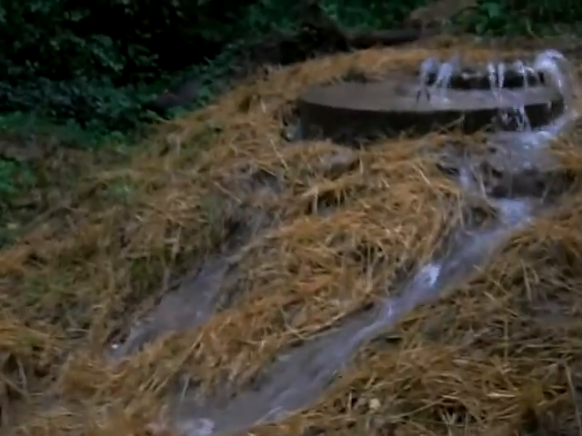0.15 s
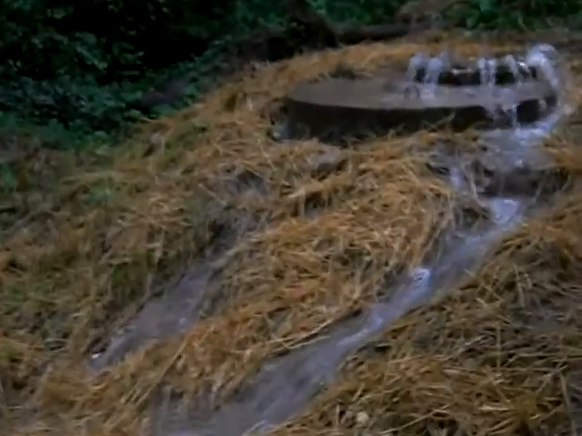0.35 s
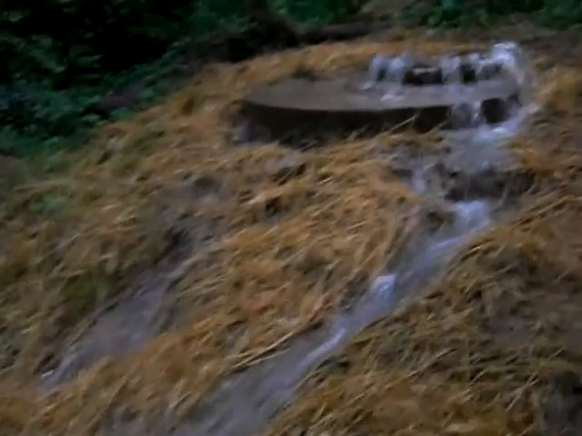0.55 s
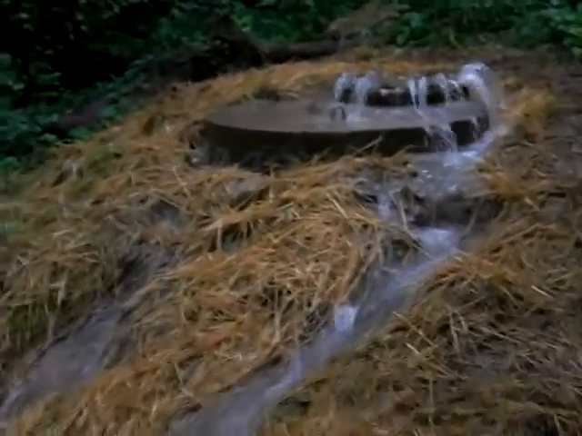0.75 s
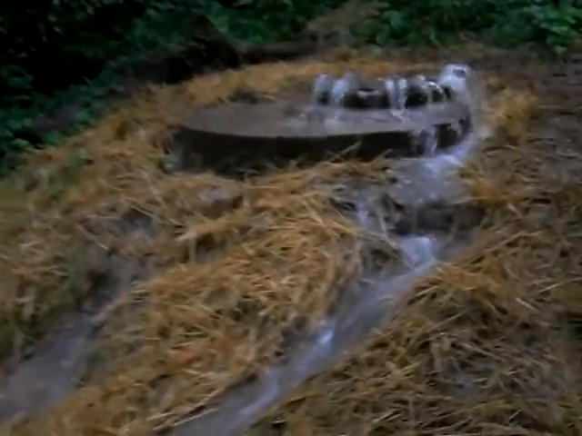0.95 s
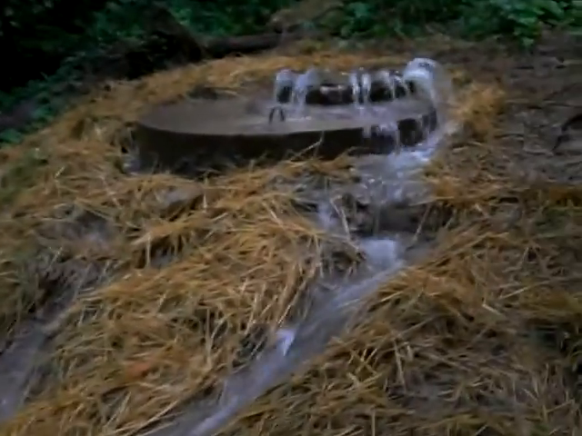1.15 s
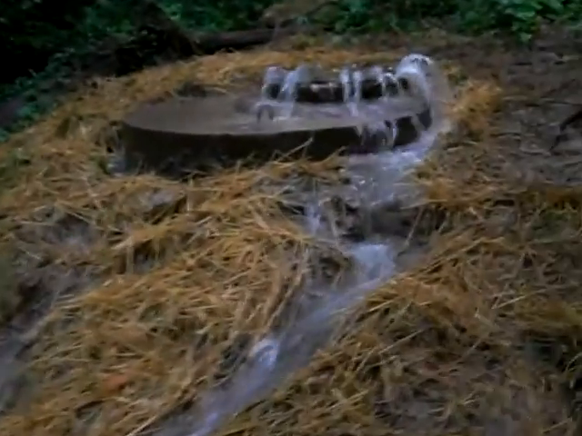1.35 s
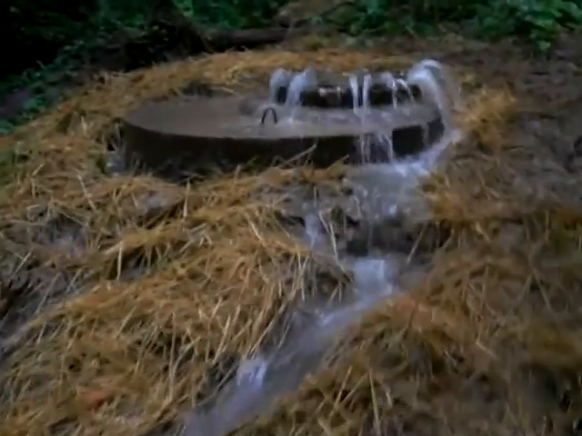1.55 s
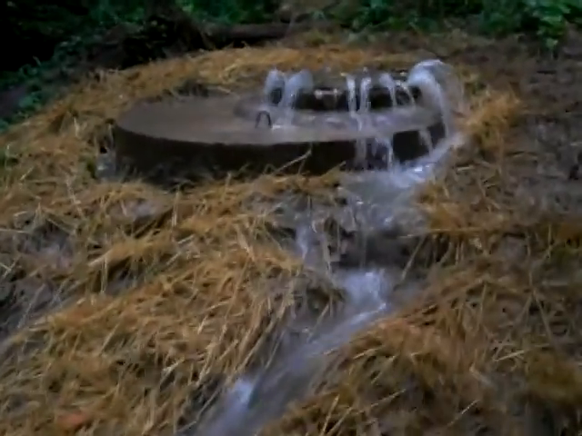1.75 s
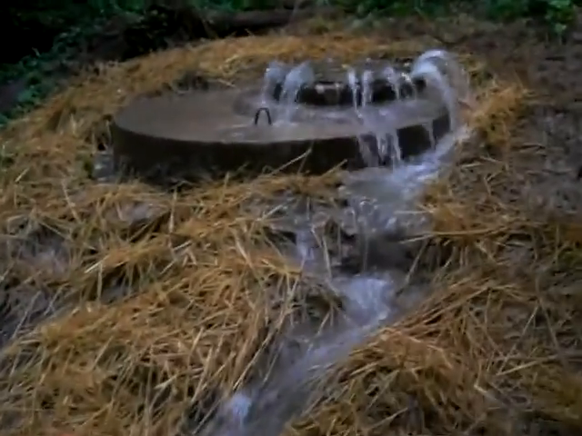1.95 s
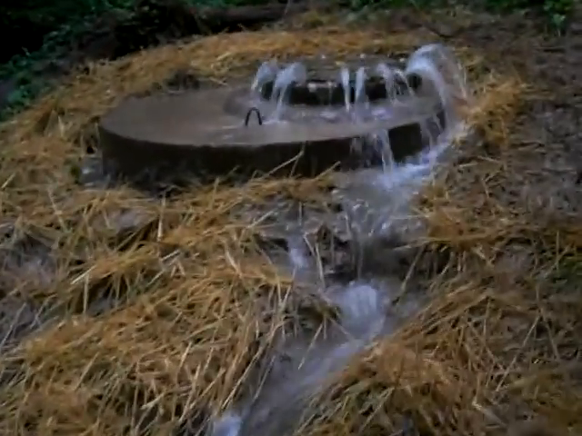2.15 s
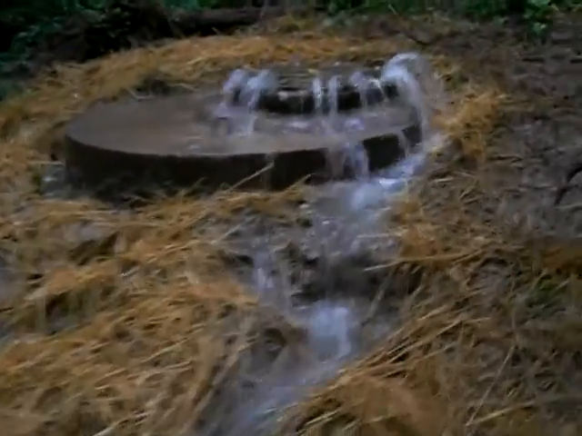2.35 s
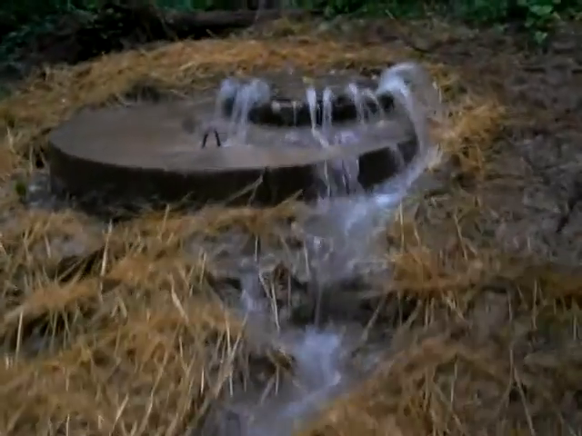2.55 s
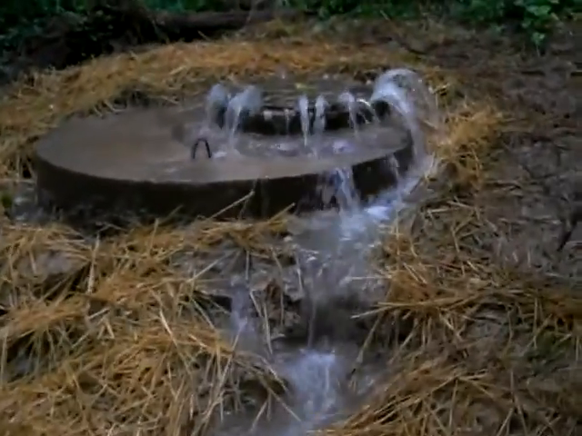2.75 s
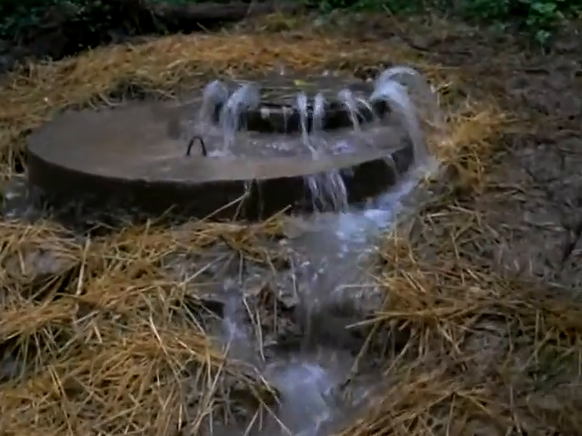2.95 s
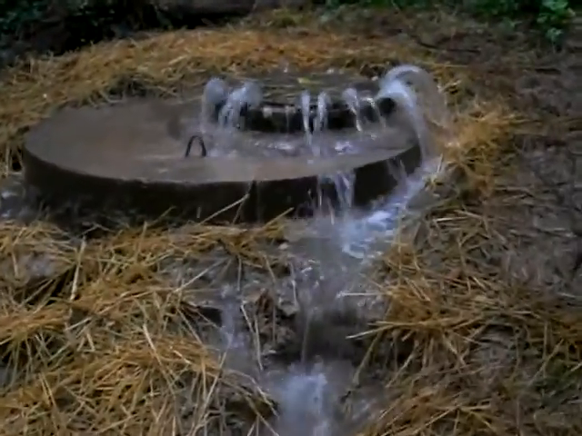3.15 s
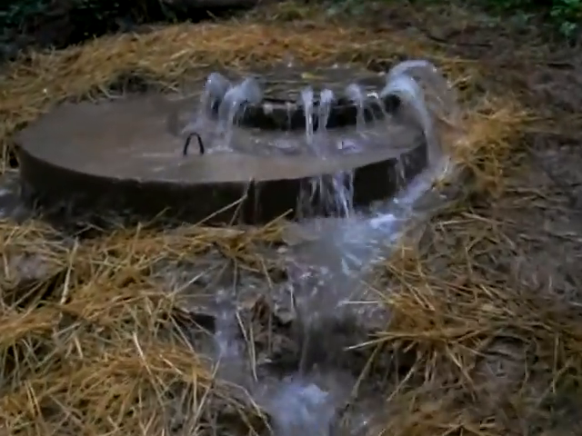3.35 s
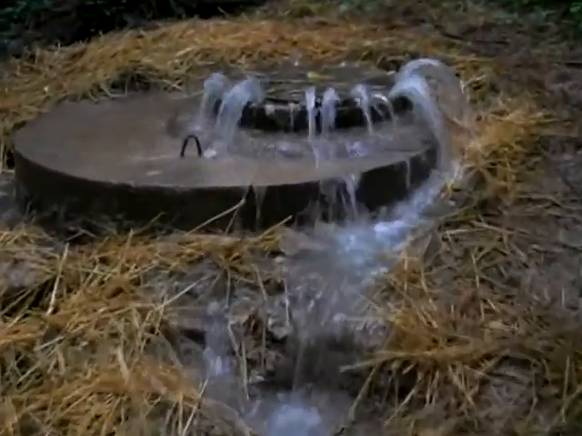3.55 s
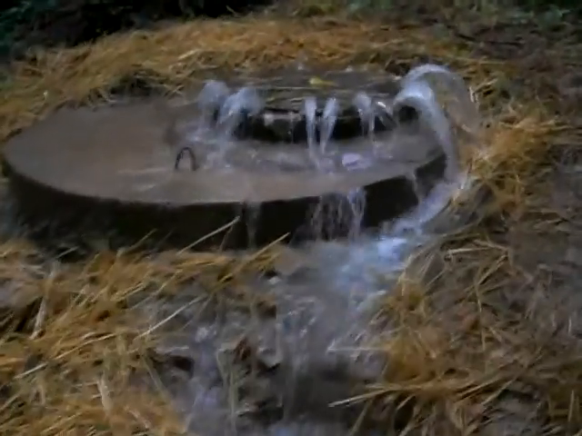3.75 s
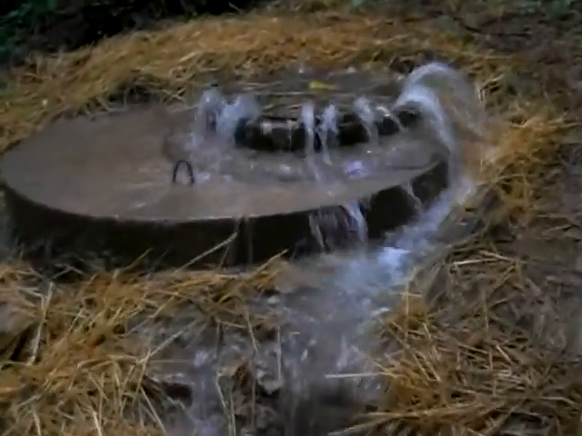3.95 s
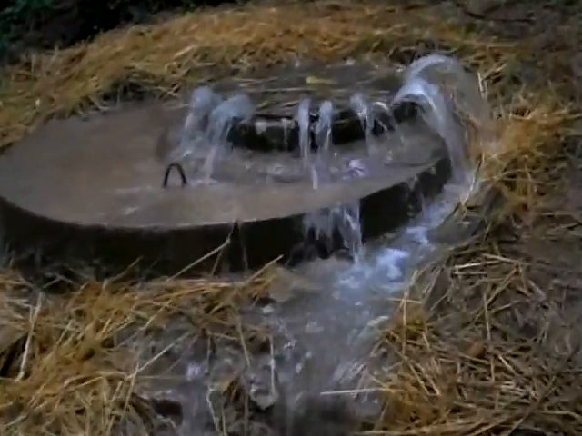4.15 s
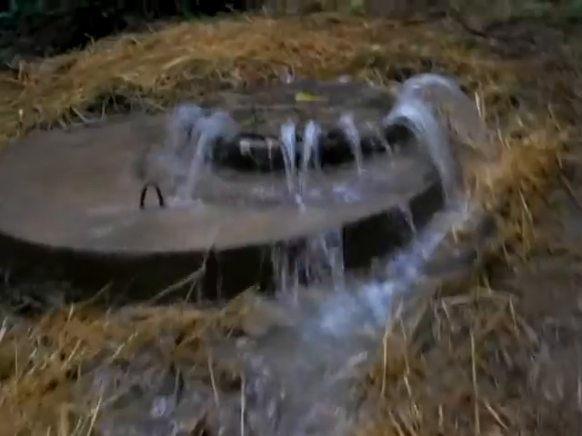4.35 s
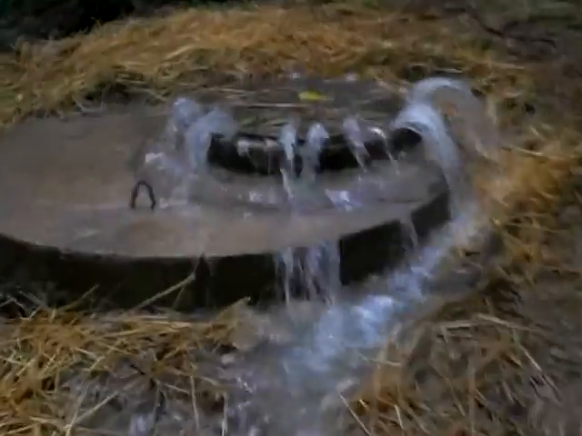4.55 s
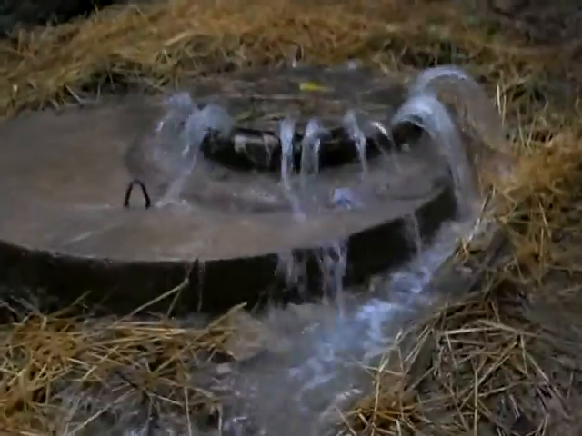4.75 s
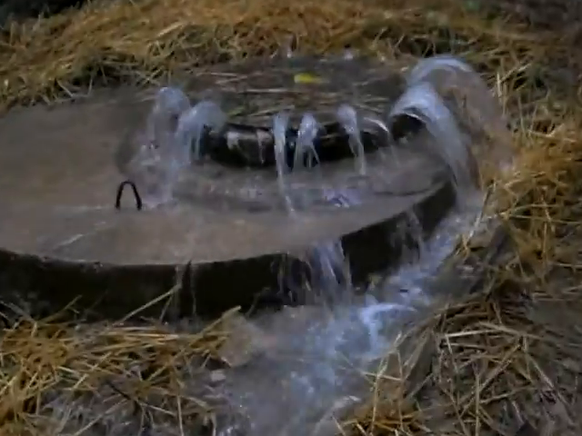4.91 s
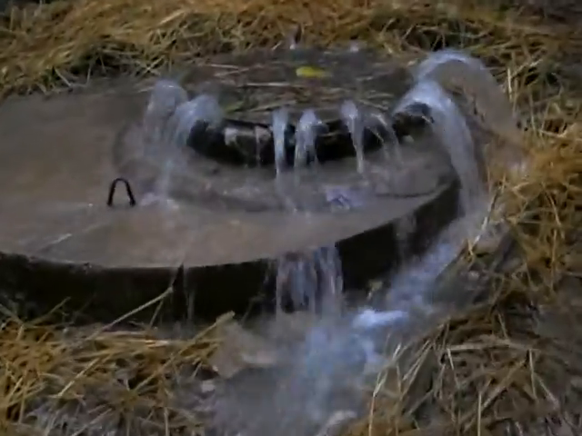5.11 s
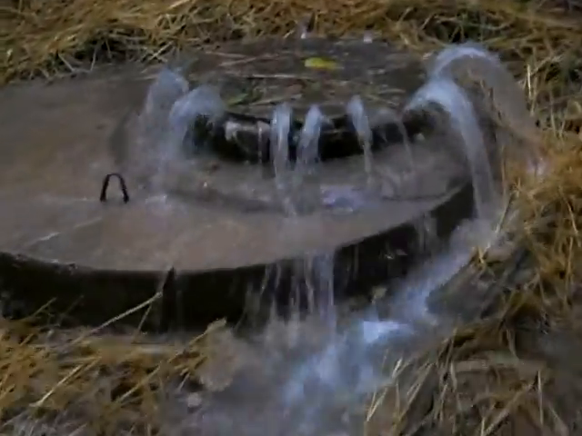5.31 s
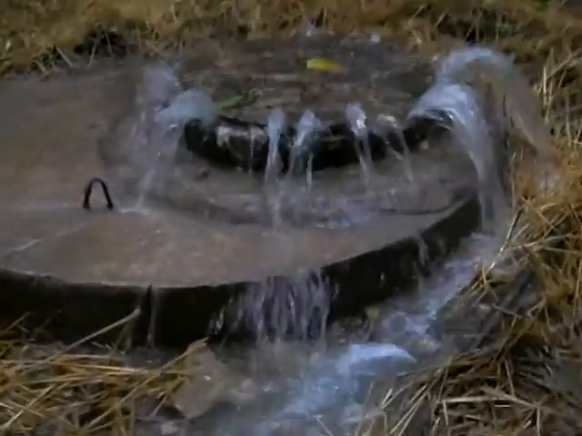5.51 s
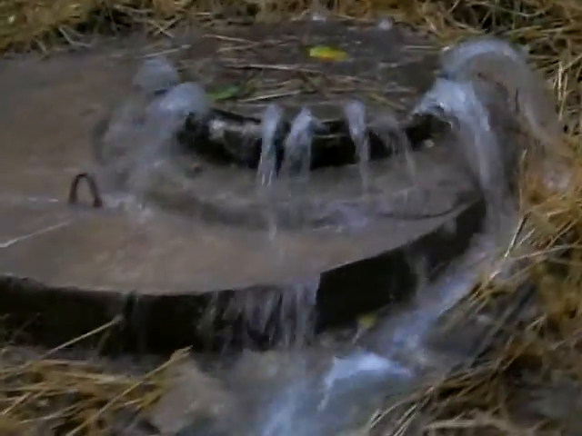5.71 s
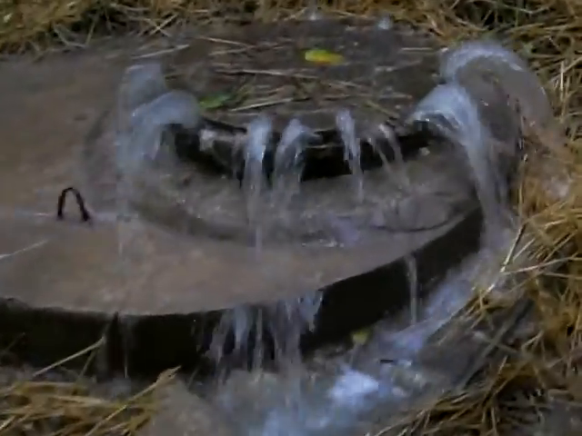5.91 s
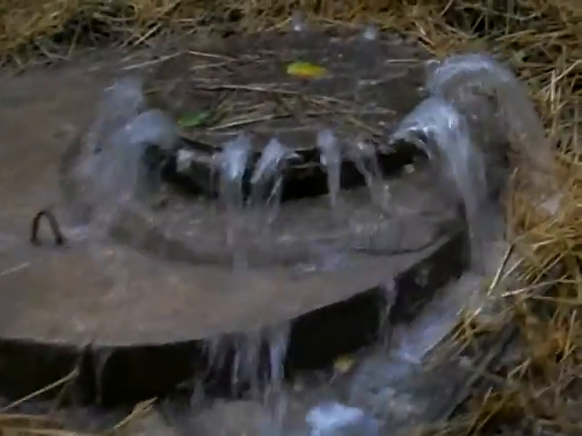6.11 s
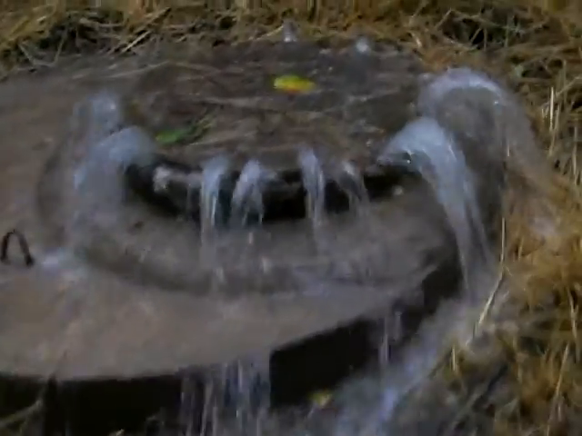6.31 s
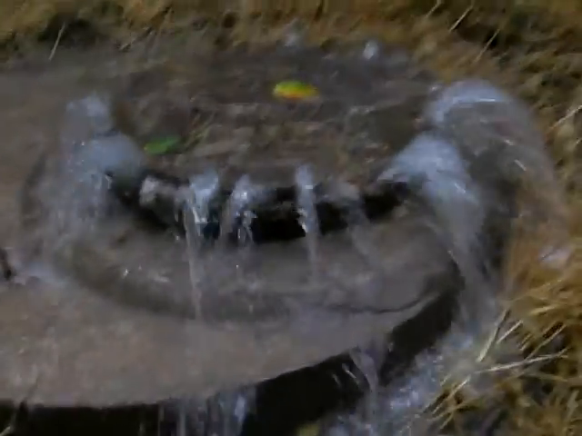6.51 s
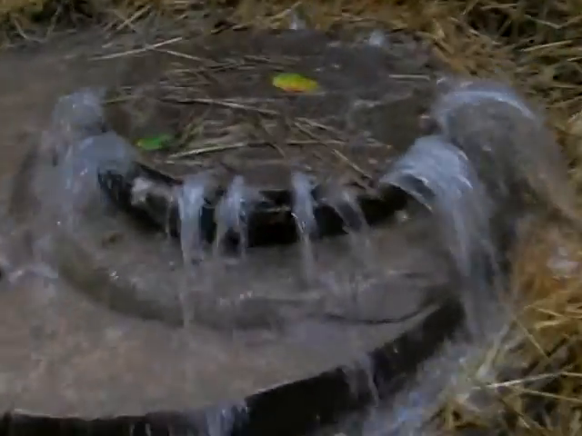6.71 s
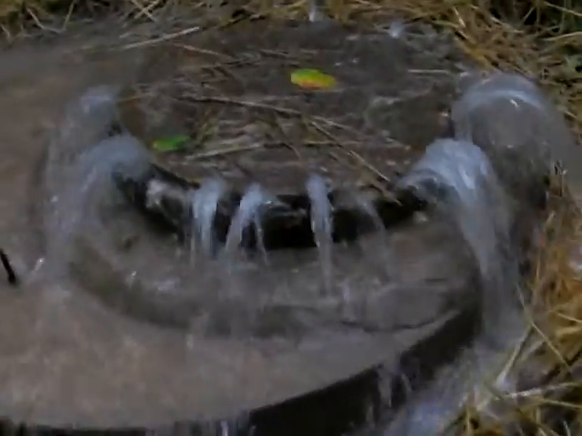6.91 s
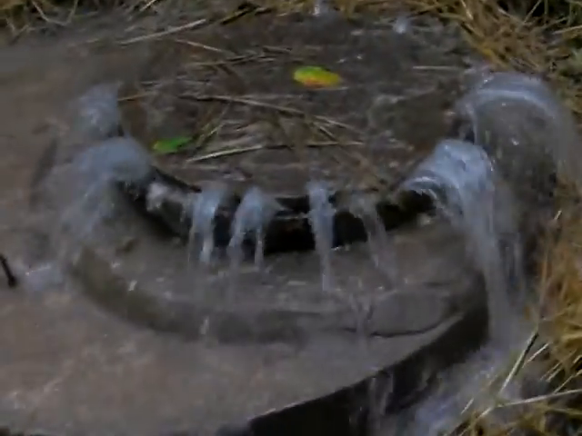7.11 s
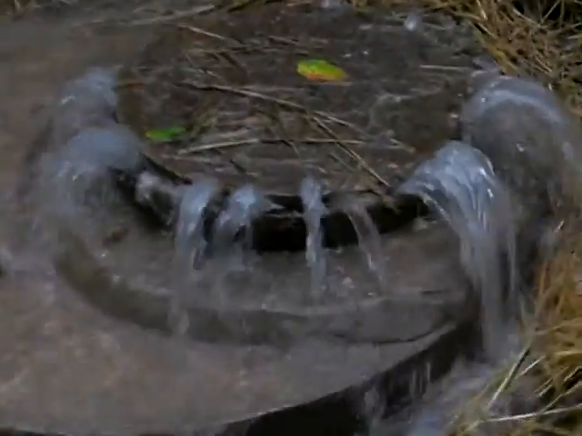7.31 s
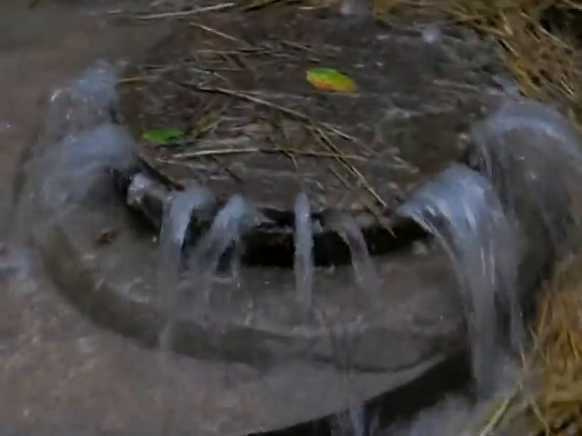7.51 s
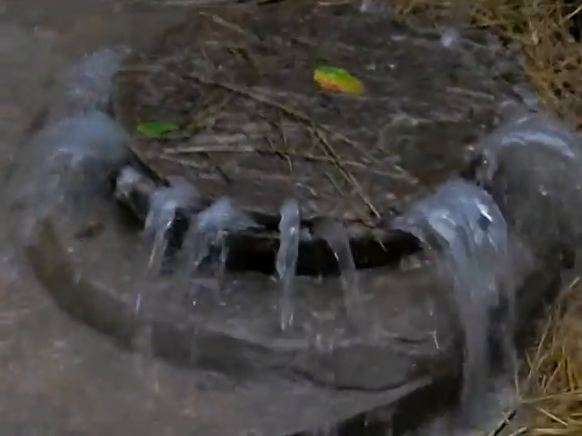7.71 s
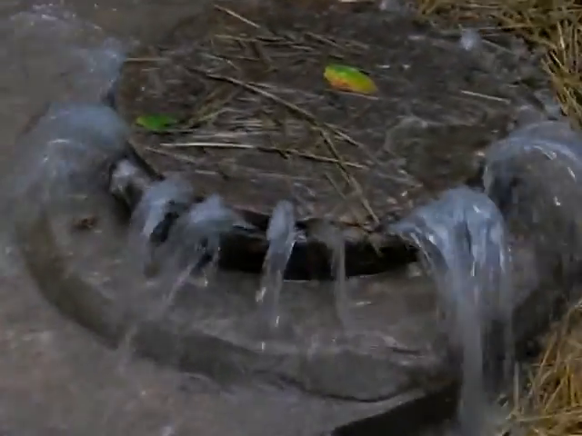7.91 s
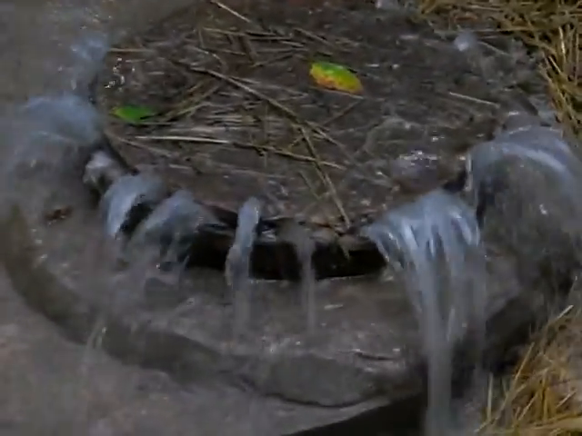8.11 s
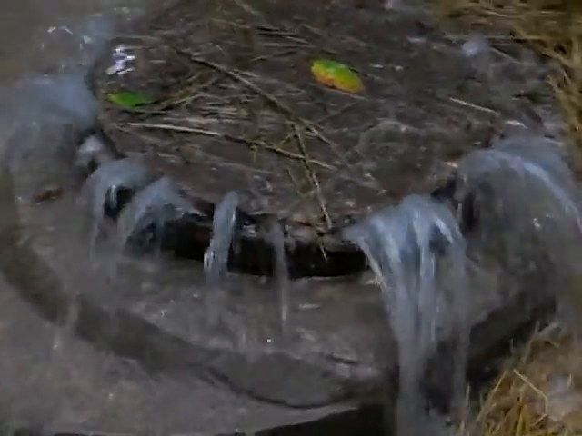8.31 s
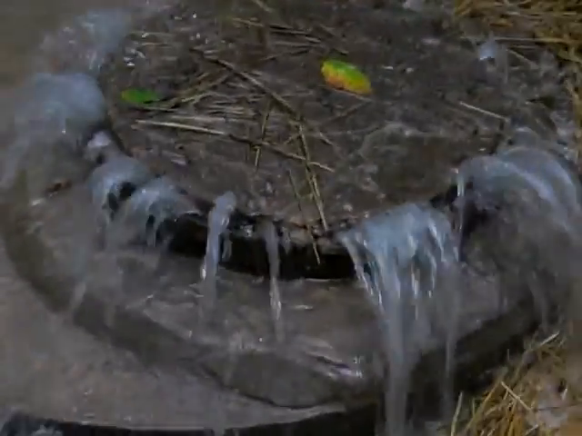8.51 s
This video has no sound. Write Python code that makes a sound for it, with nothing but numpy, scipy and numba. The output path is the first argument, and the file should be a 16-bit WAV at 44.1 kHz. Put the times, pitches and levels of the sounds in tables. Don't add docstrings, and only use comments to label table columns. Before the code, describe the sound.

A continuous outdoor spill of water, heard in mono by a microphone walking toward it. At 0 seconds it is moderately distant: a soft, bubbly babble with light spray hiss and drops pattering on concrete, while a faint low engine drone swells and fades over steady distant traffic rumble. Scattered hollow plops and small sharp ticks stand out from the start. From about 2 to 4 seconds the wash gradually thickens and brightens, with more drips and crisp splats. Around 5.5 to 6.5 seconds strong bright, watery pops jump forward, and the spray becomes close and busy. From 7 to 8.6 seconds it is loudest, with dense fizzing froth, hard splatter, rounded plops, short low gulps and bright near splats, peaking around 8.1 seconds and easing very slightly. The water never stops.

```python
import sys
import numpy as np
from scipy import signal
from scipy.fft import rfft, irfft, next_fast_len
from scipy.io import wavfile
from scipy.ndimage import uniform_filter1d
from numba import njit

SR = 44100
rng = np.random.default_rng(int(sys.argv[2]) if len(sys.argv) > 2 else 0)


def file_out(sig):
    cols = np.atleast_2d(sig).T
    lim = np.clip(cols, -1, 1)
    pcm = np.round(lim * 32767).astype(np.int16)
    wavfile.write(sys.argv[1], SR, pcm)


def ratio(d):
    e = np.asarray(d, float) / 20
    return 10 ** e


N = 382347
CLIMB = 0.015


def rms_one(x):
    return x / np.sqrt(np.mean(x ** 2) + 1e-20)


def in_time(rows):
    s, *columns = np.transpose(rows)
    return [np.interp(np.arange(N) / SR, s, column) for column in columns]


def at_hz(points, hz):
    point_hz, point_db = np.transpose(points)
    return np.interp(np.log(hz), np.log(point_hz), point_db)


def colour(x, spectrum):
    size = next_fast_len(N)
    hz = np.arange(size // 2 + 1) * SR / size + 1
    shaped = rfft(x, size) * ratio(at_hz(spectrum, hz))
    return rms_one(irfft(shaped, size)[:N])


def drift(rate):
    r = np.exp(-16 * np.pi * rate / SR)
    noise = rng.standard_normal(N // 8 + 4002)
    slow = signal.lfilter([1], [1, -2 * r, r * r], noise)[4000:]
    return np.interp(np.arange(N) / 8, np.arange(len(slow)), rms_one(slow))


def flutter(rate):
    quick = drift(rate)
    return rms_one(quick - uniform_filter1d(quick, size=SR // 11))


@njit
def add(out, peak_s, height, hz, cycles, phase, climb, rate):
    for i in range(len(hz)):
        rise = cycles[i] / 2.45 / hz[i] * rate
        start = int(peak_s[i] * rate - rise)
        for n in range(max(0, -start), min(int(8 * rise), len(out) - start)):
            u = n / rise
            turn = 2 * np.pi * hz[i] * (n - rise) / rate * (1 + climb * (u - 1) / 2)
            out[start + n] += height[i] * u * np.exp(1 - u) * np.sin(turn + phase[i])


# time in seconds, splash level in dB.
APPROACH = [
    (0.0, -37.5),
    (0.8, -36),
    (2.4, -33.5),
    (4.4, -30),
    (5.9, -28),
    (8.1, -25.5),
    (8.67, -26),
]


def approach():
    splash_db, = in_time(APPROACH)
    past_midway_db = splash_db + 30
    gurgle_db = -42 + 0.61 * past_midway_db
    babble_db = -34.5 + 0.73 * past_midway_db
    return splash_db, gurgle_db, babble_db


def nearness_db(hz, splash_db, gurgle_db, babble_db):
    low = np.clip(np.log(1400 / hz) / np.log(1400 / 800), 0, 1)
    high = np.clip(np.log(hz / 2300) / np.log(3600 / 2300), 0, 1)
    middle = 1 - low - high
    return low * (gurgle_db + 14) + high * (splash_db + 2) + middle * (babble_db + 6.5)


# frequency in Hz, level in dB per Hz.
FROTH = [(120, -44), (200, -12.5), (231, -8.5), (344, -13), (405, -6), (570, 0.5), (775, -2.5), (2290, 2.5),
         (3120, -2.5), (3800, -0.5), (10500, -5.5), (11900, -11.5), (15000, -15)]


def froth(splash_db, gurgle_db, babble_db, per_s, spread_db, clump_db, cycles, climb):
    place, pitch, size, length, phase = rng.random((5, int(per_s * N / SR)))
    at = (place * (N - 1)).astype(int)
    hz = (200 ** 0.5 + pitch * (15500 ** 0.5 - 200 ** 0.5)) ** 2
    size_db = spread_db * np.minimum(-np.log(size + 1e-9), 4)
    lows, highs = flutter(21), flutter(51)
    clumps = np.where(hz < 1500, lows[at], 0.52 * lows[at] + highs[at])
    turns = cycles * (0.6 + 0.8 * length)
    height = ratio(size_db + clump_db * clumps + at_hz(FROTH, hz)) * hz ** 0.75
    power = np.sum(height ** 2 * turns / hz) * 0.377 * SR / N
    height = height * ratio(nearness_db(hz, splash_db[at], gurgle_db[at], babble_db[at]))
    near = np.zeros(N)
    add(near, at / SR, height, hz, turns, 2 * np.pi * phase, climb, SR)
    return near / np.sqrt(power)


# frequency in Hz, level in dB per Hz.
SPATTER = [(500, -25), (1500, -2), (4000, 2.5), (9000, -4.5), (12000, -4.5), (16000, -30)]


def spatter(per_s, spread_db, clump_db, burst_s):
    sizes = ratio(spread_db * np.minimum(rng.exponential(1, N), 3.5))
    flurries_db = clump_db * (flutter(22) + 0.7 * flutter(45))
    struck = rng.random(N) < per_s * ratio(flurries_db) / SR
    fade = signal.lfilter([1], [1, -np.exp(-1 / (burst_s * SR))], sizes * struck + 1e-18)
    return colour(fade * rng.standard_normal(N), SPATTER)


# frequency in Hz, level in dB per Hz.
HISS = [(120, -40), (200, -15), (333, -13), (576, -4.5), (757, -3), (1850, 0.5), (3200, -1.5), (5630, -2.5),
        (10300, -6.5), (13000, -13), (15700, -26)]


def hiss(splash_db, gurgle_db, babble_db, flicker_db):
    spray = colour(rng.standard_normal(N), HISS) * ratio(flicker_db * flutter(25))
    low = signal.sosfilt(signal.butter(2, 1050, fs=SR, output="sos"), spray)
    high = signal.sosfilt(signal.butter(2, 2800, "high", fs=SR, output="sos"), spray - low)
    middle = spray - low - high
    return low * ratio(gurgle_db + 12.5) + high * ratio(splash_db + 3) + middle * ratio(babble_db + 6.5)


# time in seconds, level in dB.
DRONE = [(0.0, -67), (0.09, -51), (0.46, -58), (0.55, -47), (0.82, -70), (1.62, -58), (1.71, -76),
         (2.27, -49.5), (3.09, -58), (3.24, -52), (4.01, -68), (4.05, -55.5), (6.76, -60), (6.88, -48),
         (7.48, -60), (8.09, -49), (8.67, -56)]
# multiple of its base pitch, level in dB.
DRONE_ORDERS = [
    (1, 0),
    (4 / 3, -9.5),
    (2.2, -13.5),
]


def far_engine():
    base_hz = 78.1 + 0.54 * drift(2.7)
    turn = 2 * np.pi * np.cumsum(base_hz) / SR
    drone = sum(ratio(db + 1.5 * drift(3.9)) * np.sin(k * turn) for k, db in DRONE_ORDERS)
    return ratio(in_time(DRONE)[0] + 2) * drone


# frequency in Hz, level in dB per Hz.
RUMBLE = [(12, -35), (20, -6.5), (80, -1), (198, -8.5), (258, -9.5), (400, -6.5), (520, -32), (880, -120)]


def far_traffic():
    return ratio(-50.5) * colour(rng.standard_normal(N), RUMBLE)


def lesser_bubbles(splash_db):
    per_s, low_hz, high_hz = 14, 703, 8340
    place, pitch, length = rng.random((3, int(per_s * N / SR)))
    hz = low_hz * (high_hz / low_hz) ** pitch
    over_splash_db = 1.5 + 4 * np.log2(hz / 1000)
    peak_db = splash_db[(place * N).astype(int)] + over_splash_db
    cycles = 5.3 * (0.5 + length)
    return np.transpose([place * N / SR, peak_db, hz, cycles])


# time of the peak in seconds, peak level in dB, pitch in Hz, length in cycles at half height.
PLOPS = [(0.0728, -20, 1250, 2.9), (1.276, -29, 1120, 11), (1.3205, -32, 567, 9.7),
         (1.4415, -22.5, 1260, 2.7), (1.5332, -28.5, 520, 2.3), (1.8382, -23, 1460, 7),
         (2.0441, -29, 597, 5.5), (2.0634, -34, 600, 14), (2.2408, -21, 1470, 3.4), (2.6244, -32, 470, 8.5),
         (2.813, -22, 1480, 4.9), (2.9882, -26.5, 950, 10), (3.4527, -29.5, 410, 8.6),
         (3.8225, -30, 440, 6.1), (3.9704, -25, 1370, 10), (4.2676, -24, 1370, 7.5),
         (4.422, -24.5, 463, 3.1), (4.7377, -27, 620, 5.4), (5.0401, -29, 450, 3.9),
         (5.3014, -26, 493, 3.9), (5.6634, -28, 417, 3.7), (6.0516, -29, 416, 6.2),
         (6.2831, -18, 1230, 3.4), (6.402, -23.5, 480, 4.7), (6.6649, -26, 606, 4.8),
         (7.2572, -17.5, 617, 3.6), (7.6528, -24.5, 633, 3.5), (8.1684, -28.5, 625, 7.4),
         (7.8606, -21, 543, 5.6), (8.0377, -21, 472, 3.9)]
# time of the peak in seconds, peak
# level in dB, pitch in Hz, length in cycles at half height.
TICKS = [(0.4167, -12.5, 1900, 1.5), (1.729, -16, 2880, 3.8), (2.049, -14.5, 4220, 2.9),
         (2.0946, -14, 4840, 4.6), (2.3532, -14.5, 2450, 4.1), (2.431, -14, 5480, 3.2),
         (2.6393, -16.5, 2100, 4.4), (2.7046, -14, 7760, 5.1), (2.883, -18, 2630, 6.3),
         (3.1192, -10, 6200, 4.6), (3.4976, -15, 5480, 4.6), (3.753, -14, 8300, 6.7),
         (3.8543, -7.5, 7120, 2.6), (0.8771, -22, 3540, 6.4), (0.287, -22, 2470, 9.2),
         (4.637, -11, 5980, 5.3), (5.3937, -13, 5980, 3.9), (5.5357, -2, 6370, 2.5),
         (5.6134, -12, 5450, 3.5), (5.7351, -3, 5500, 2.2), (5.865, -11, 6440, 9.3),
         (6.006, -11, 4080, 4.8), (6.091, -8, 2600, 4.1), (6.1122, -8, 6520, 5.3), (6.3507, -8, 7120, 3.5),
         (6.6153, -8, 2260, 2.8), (7.399, -8, 7760, 4.2), (7.5431, -7.5, 3540, 5.8),
         (7.8756, -10, 3800, 10), (8.2898, -10.5, 3000, 3.8)]
# time of the peak in seconds, peak
# level in dB, pitch in Hz, length in cycles at half height.
MORE_TICKS = [(1.4764, -21, 4600, 7), (1.773, -20, 3870, 4.5), (2.897, -16, 5950, 4.6), (3.901, -14, 5020, 5.1),
              (4.42, -13, 5980, 5.3), (4.431, -16, 2100, 2.5), (4.7367, -16, 2100, 1.7),
              (4.7596, -11, 4220, 2.6), (5.679, -17, 5940, 12), (5.7506, -13, 2940, 3.5),
              (5.924, -13, 3870, 5.1), (6.1392, -14, 4400, 5.8), (6.547, -13, 7060, 7.5),
              (7.008, -13.5, 2830, 8.8), (7.154, -10, 5300, 4.6), (7.5963, -11, 2500, 4), (7.622, -16, 3300, 9),
              (7.709, -9, 4600, 3.5), (8.3219, -11, 3540, 3), (8.4507, -14.5, 2300, 2.3),
              (8.5142, -12, 3800, 7.2), (8.6478, -12, 2980, 3.9)]
# time of the peak in seconds, peak level in dB, pitch in Hz, length in cycles at half height.
GULPS = [
    (5.3624, -30, 260, 1.3),
    (6.2465, -40, 235, 9.2),
    (6.9107, -36, 280, 7.1),
    (6.9767, -31, 340, 2.4),
    (7.541, -36, 260, 3.1),
    (7.5927, -31.5, 400, 3.9),
    (7.8294, -33, 280, 2.2),
    (8.28, -30, 400, 3),
    (8.467, -34, 220, 2.2),
]


def big_bubbles(lesser, shorten, snap_db, snap_cycles):
    s, peak_db, hz, cycles = np.vstack([PLOPS, GULPS, TICKS, MORE_TICKS, lesser]).T
    ring_phase, snap_pitch, snap_phase = rng.random((3, len(s)))
    out = np.zeros(N)
    ring_cycles = np.clip(shorten * cycles, 1, 14)
    add(out, s, ratio(peak_db - 3), hz, ring_cycles, 2 * np.pi * ring_phase, CLIMB, SR)
    snap_hz = hz * 2 ** (1.5 * snap_pitch - 0.7)
    add(out, s, ratio(peak_db + snap_db), snap_hz, snap_cycles + 0 * s, 2 * np.pi * snap_phase, CLIMB, SR)
    return out


# time of the peak in seconds, level of the top octave in dB.
SPLATS = [(0.1964, -27), (0.5917, -29), (1.6124, -30), (1.8832, -27), (2.277, -22), (2.6599, -20),
          (2.9997, -23), (3.1951, -26), (3.6561, -24), (3.7967, -23), (3.8659, -20), (4.0846, -25),
          (4.1513, -21), (4.5509, -23), (4.801, -20), (4.9016, -22), (5.4065, -21), (5.5355, -20),
          (5.593, -26), (5.7368, -20), (5.7754, -21), (5.9532, -21), (6.2173, -22), (6.7897, -19),
          (7.1787, -16), (7.2067, -19), (7.3286, -21), (7.6004, -18), (8.061, -16), (8.2, -18)]
# frequency in Hz, level in dB per Hz.
CRACK = [(2000, -28), (5000, -2), (8000, 0), (11000, 4), (16000, -13.5)]


def big_splats(burst_s):
    s, peak_db = np.transpose(SPLATS)
    hits = np.zeros(N)
    hits[((s - burst_s) * SR).astype(int)] = ratio(peak_db - 1.5) * np.e / (burst_s * SR)
    r = np.exp(-1 / (burst_s * SR))
    fade = signal.lfilter([1], [1, -2 * r, r * r], hits + 1e-18)
    return fade * colour(rng.choice([-1.0, 1.0], N), CRACK)


def scene():
    levels = splash_db, gurgle_db, babble_db = approach()
    water = ratio(-1.5) * froth(*levels, per_s=10000, spread_db=3.5, clump_db=1.31, cycles=5, climb=CLIMB)
    water += ratio(splash_db - 8) * spatter(per_s=700, spread_db=5, clump_db=5, burst_s=0.0014)
    water += ratio(-5) * hiss(*levels, flicker_db=0.1)
    water += big_bubbles(lesser_bubbles(splash_db), shorten=0.94, snap_db=-9, snap_cycles=1.7)
    mix = water + big_splats(burst_s=0.00072) + far_engine() + far_traffic()
    return mix[None]


def low_pass(x):
    return signal.sosfilt(signal.butter(12, 15740, fs=SR, output="sos"), x)


def record(dry):
    notch_hz, notch_width_hz, top_hz = 7637, 110, 15800
    notched = signal.lfilter(*signal.iirnotch(notch_hz, notch_hz / notch_width_hz, fs=SR), dry)
    cut = signal.sosfilt(signal.ellip(12, 0.5, 90, top_hz, fs=SR, output="sos"), notched)
    return low_pass(cut)


dry = scene()
out = record(dry)
file_out(out)
```